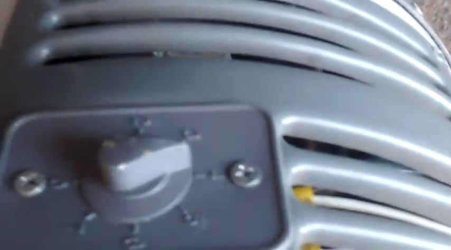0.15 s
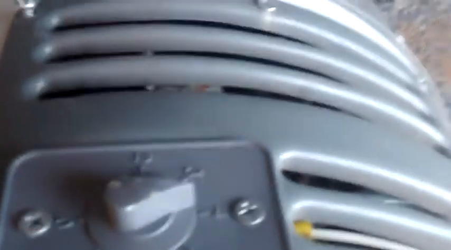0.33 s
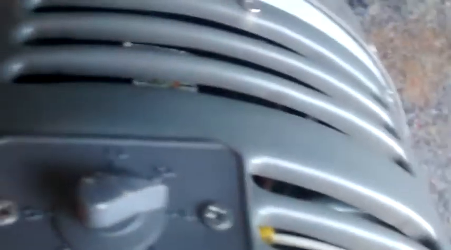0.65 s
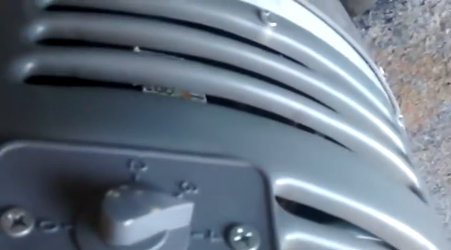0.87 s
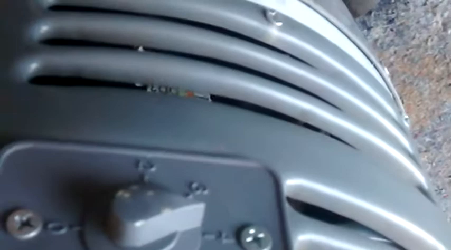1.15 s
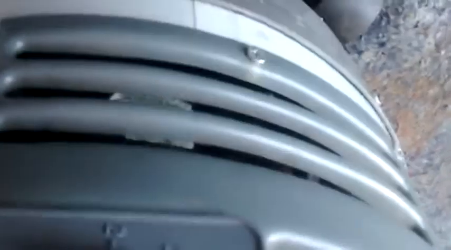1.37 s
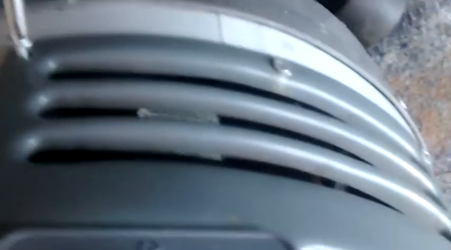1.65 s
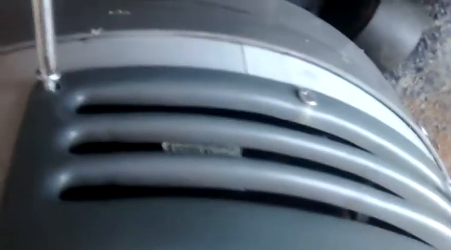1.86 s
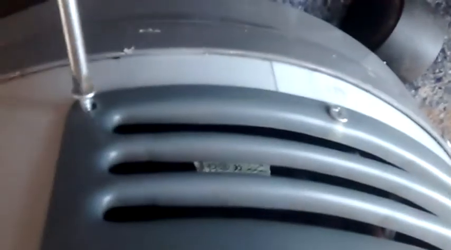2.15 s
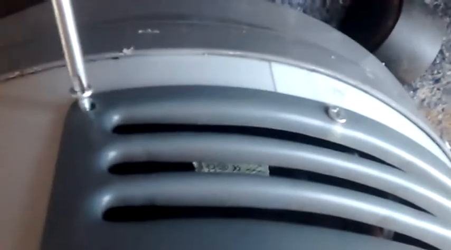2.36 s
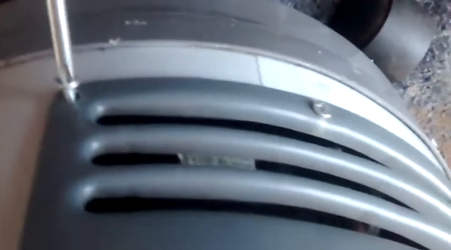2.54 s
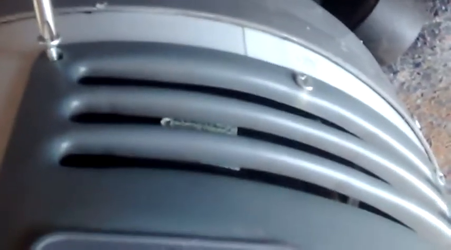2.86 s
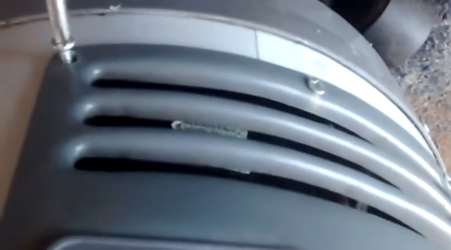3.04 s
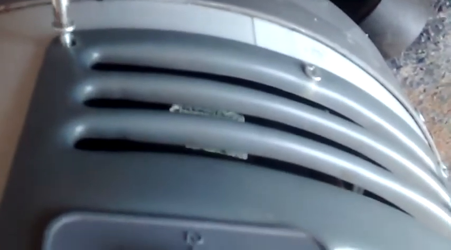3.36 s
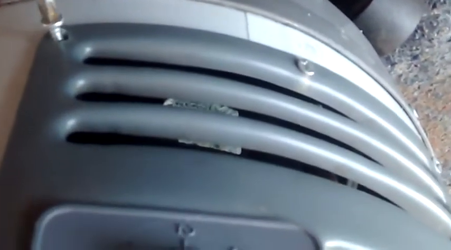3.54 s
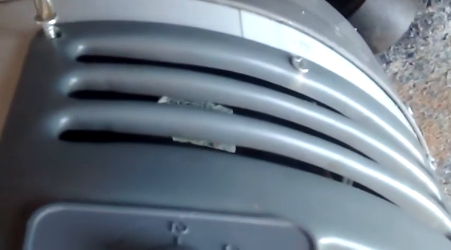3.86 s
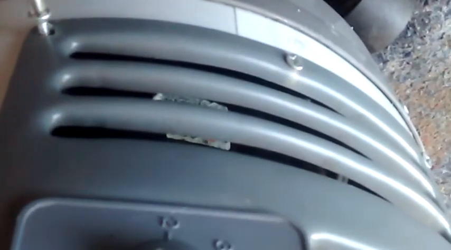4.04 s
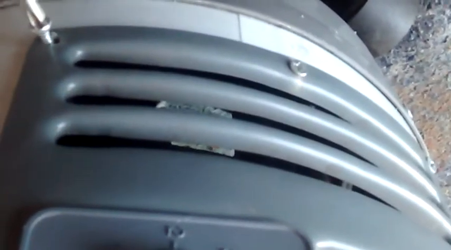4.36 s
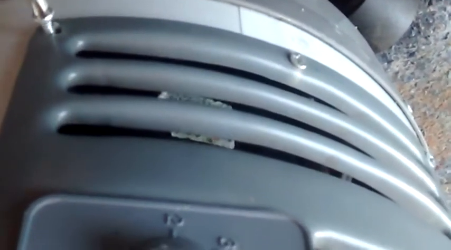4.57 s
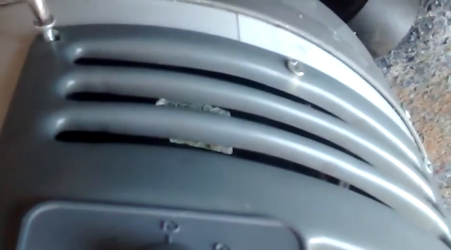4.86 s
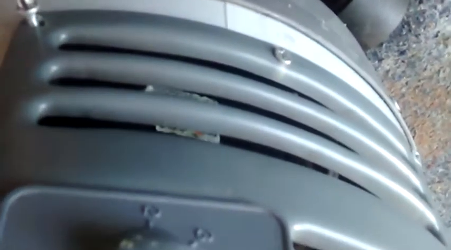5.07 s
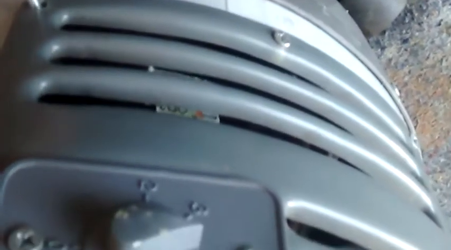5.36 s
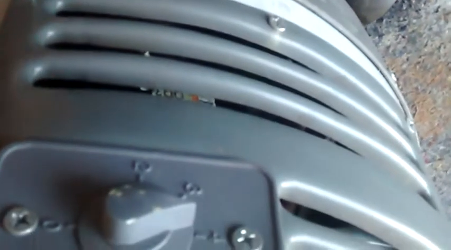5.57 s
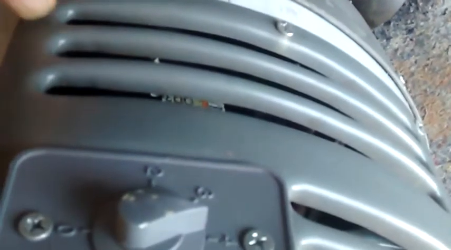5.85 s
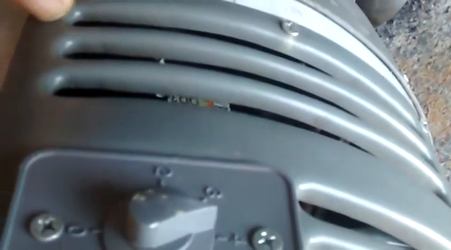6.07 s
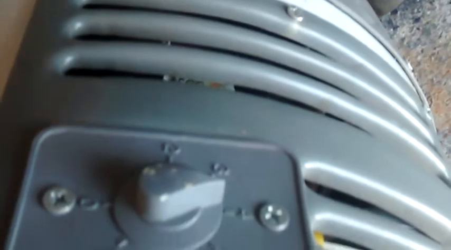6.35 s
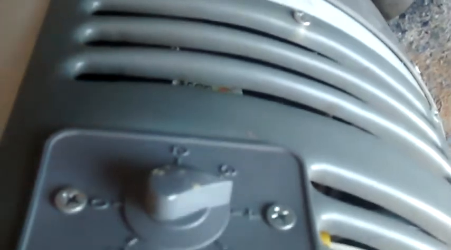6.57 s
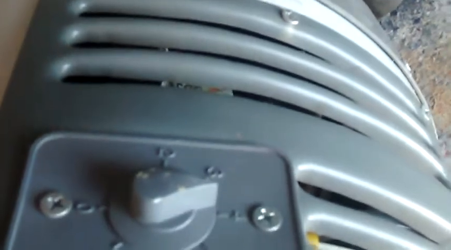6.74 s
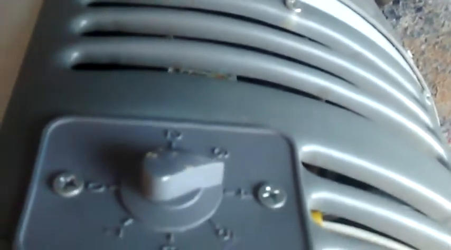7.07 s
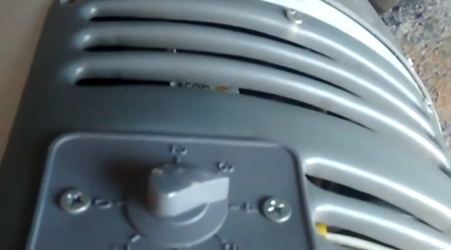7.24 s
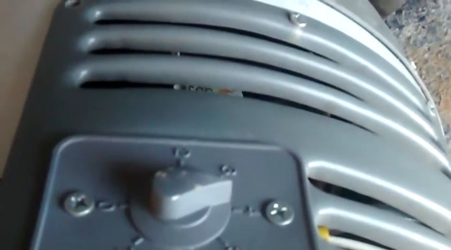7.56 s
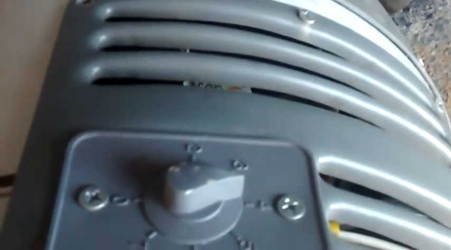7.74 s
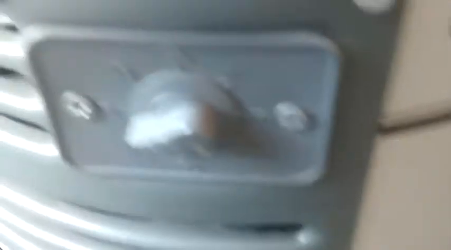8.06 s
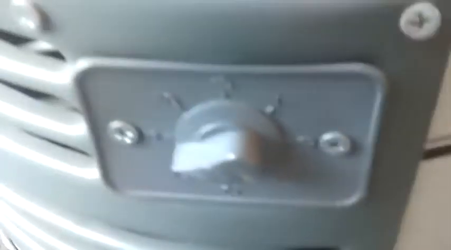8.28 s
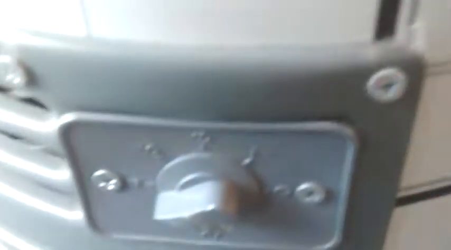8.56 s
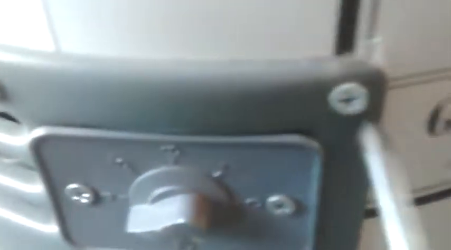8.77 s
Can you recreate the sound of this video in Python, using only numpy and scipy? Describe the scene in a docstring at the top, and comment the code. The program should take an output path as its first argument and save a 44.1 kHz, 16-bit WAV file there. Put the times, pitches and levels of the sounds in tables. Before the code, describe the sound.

A small refrigeration machine hums, whirs and buzzes steadily up close, with light metallic screwdriver clicks and one loud hollow knock on its casing.

```python
"""Close beside a small refrigerator, heard through a handheld phone with two microphones.
A five-blade fan makes shaped noise, its motor and the mains hum as sines, and once a turn the compressor
taps its steel shell, which rings as a buzz. A screwdriver makes light clicks of ringing steel and one loud,
hollow knock on the cabinet among softer ones. Near the end the phone swings away from the shell."""
import sys
import numpy as np
from scipy import signal
from scipy.fft import rfft, irfft
from scipy.io import wavfile

SR = 44100
rng = np.random.default_rng(int(sys.argv[2]) if len(sys.argv) > 2 else 0)


def dump(signal):
    """Clip the signal to [-1, 1] and save it as 16-bit WAV at the path in sys.argv[1]."""
    limited = np.clip(np.atleast_2d(signal).T, -1, 1)
    pcm = np.round(limited * 32767).astype(np.int16)
    wavfile.write(sys.argv[1], SR, pcm)


N = 392931
TIME = np.arange(N) / SR  # s
FREQ = np.maximum(np.fft.rfftfreq(N, 1 / SR), 1)  # Hz, kept above zero for the logarithm
ROTOR_BARS, BLADES, MAINS_HUM_HZ = 26, 5, 120


def undb(db):
    """Turn decibels into a gain."""
    return 10 ** (np.asarray(db) / 20)


def over_time(table):
    """Draw straight lines between the rows of a table to get each column at every sample."""
    s, *columns = np.transpose(table)
    return [np.interp(TIME, s, column) for column in columns]


def over_freq(table):
    """Fill in each column of a table at every frequency, with even steps in pitch."""
    hz, *columns = np.transpose(table)
    return [np.interp(np.log(FREQ), np.log(hz), column) for column in columns]


def walk(rate):
    """Glide smoothly between random values, `rate` of them a second, with a spread near 1."""
    place = TIME * rate
    knots = rng.standard_normal(1024)
    k = place.astype(int) % 1023
    glide = np.sin(np.pi / 2 * (place % 1)) ** 2
    # the factor makes up for the spread lost between the random values
    return 1.169 * (knots[k] + np.diff(knots)[k] * glide)


def ring(modes, t, tilt_db=0, free=1):
    """Ring like a struck solid: each mode is a sine that dies away; `free` under 1 shortens the ring."""
    hz, db, t60 = np.transpose(modes)[:, :, None]
    # the tilt, in dB per octave, turns about the middle pitch
    gain = undb(db + tilt_db * np.log2(hz / np.median(hz)))
    decay = np.exp(-np.log(1000) * t / (t60 * free))
    return np.sum(gain * np.sin(2 * np.pi * hz * t) * decay, axis=0)


def add(track, s, sound):
    """Mix a sound into a track from time s on."""
    start = int(s * SR)
    track[start:start + len(sound)] += sound[:N - start]


def ports(spectrum, pan_db=0, diffuse=False):
    """Sound reaches the two microphones at different levels and phases; diffuse sound is partly unrelated."""
    # the phone's microphones: f/Hz, phase by which left leads/rad, left minus right/dB, coherence/0-1
    microphones = [(30, 3.5, -2, 1), (130, 2, -5, 0.96), (230, 2, 1.7, 0.96), (352, 1.55, 0.5, 0.87),
                   (690, 0.9, 6.5, 0.96), (724, 0.8, 2, 0.74), (1180, -0.5, 3.5, 0.92), (1430, -0.45, 1, 1),
                   (1975, 1.7846, 1, 0.81), (2702, 3, -0.5, 0.99), (2833, 3.5, 0.5, 1), (3140, 4, 1.5, 0.6),
                   (3420, 5, 0, 0.5), (3980, 6, 1, 0.88), (4690, 7.5, 1, 0.78), (7920, 14.5, 2.5, 0.7),
                   (11300, 23, -1.5, 0), (15200, 37, -1.5, 0.3)]
    phase, balance_db, coherence = over_freq(microphones)
    sides = np.array([[1], [-1]])  # left, right
    gain = undb(sides * (balance_db + pan_db) / 2)
    gain = gain / np.sqrt(np.mean(gain ** 2, axis=0))  # keep the mean power of the pair
    if diffuse:
        scatter = np.exp(2j * np.pi * rng.random((2, len(FREQ))))
        spectrum = spectrum * (np.sqrt(coherence) + np.sqrt(1 - coherence) * scatter)
    return irfft(spectrum * gain * np.exp(.5j * sides * phase), N)


SWING_S, SWING_TAKES_S = 7.95, 0.06  # middle and length of the phone's swing away from the shell


def swung():
    """The phone turns steadily during its swing: 0 before, 1 after."""
    return np.clip((TIME - SWING_S) / SWING_TAKES_S + .5, 0, 1)


def fan_turns():
    """Turns of the fan so far; the whine lies one mains hum above the rate of the rotor bars."""
    # whine of the fan motor, which follows the fan's wandering speed: t/s, f/Hz
    whine = [(0.0, 792.0), (0.1, 793.6), (0.79, 786.7), (1.02, 790.8), (2.13, 791.2), (2.26, 795.1),
             (2.41, 787.5), (2.66, 794.0), (2.9, 790.0), (3.13, 793.0), (3.33, 786.6), (3.67, 793.2),
             (3.9, 785.5), (4.24, 790.9), (6.06, 789.5), (6.4, 795.1), (6.7, 784.8), (7.25, 792.1),
             (7.59, 784.8), (8.12, 790.9), (8.41, 788.4), (8.69, 793.7), (8.91, 793.4)]
    whine_hz, = over_time(whine)
    fan_hz = (whine_hz - MAINS_HUM_HZ) / ROTOR_BARS
    return np.cumsum(fan_hz) / SR


def airflow(flutter_db=1.45, throb=0.058, throb_twice=0.079, hiss_hz=2500):
    """Turbulent air is noise that throbs once and twice a fan turn; the housing's resonances colour it."""
    # rush of air through the grille, before the housing: f/Hz, level/dB per Hz
    grille = [(12, -57), (28, -60), (60, -77.5), (85, -74), (105, -69.5), (140, -61), (300, -71),
              (700, -74.5), (1050, -86.5), (2000, -85.5), (3100, -99), (4500, -97.5), (9000, -104.5),
              (10500, -109.1), (15000, -115.3)]
    # resonances of the housing: f/Hz, width at half the lift in dB/Hz, lift/dB
    housing = [(182.2, 45.6, 10), (257.4, 37, 5), (390, 148, 4), (527, 23.5, 6), (613, 128, 8),
               (917, 105, 6.5), (1213, 60, 6), (1327, 39, 6), (1540, 57, 2.5), (1906, 120, 3),
               (2205, 55, -8), (2390, 53, -3), (2543, 850, 6), (4070, 370, 1), (6360, 190, 2),
               (7850, 420, 0.5)]
    # what the moving phone picks up of the rush: t/s, body/dB, hiss/dB
    position = [(0, 1, 1), (.7, 0.5, -1), (1.2, -0.3, 0.5), (1.7, -0.06, 0.5), (4, 0, -0.6), (6, -0.6, 0.5),
                (7.8, 0.5, -1.1), (8.15, 2, -3), (8.4, 0.6, -1.5), (8.55, 4.5, -4.5), (8.72, 0.4, -5),
                (8.91, 1.5, -1.5)]
    # change of the rush once the phone has swung: f/Hz, left/dB, right/dB, added lead of the left/rad
    swing = [(120, 3, -2, 0.029), (252, -4.5, -1, -0.02), (370, 2, 0, 0.24), (490, -6, -4.5, -0.026),
             (620, -1.5, 1, -0.83), (970, 2, 3, -0.57), (1400, -2.5, 3.5, 0.87), (1500, 4, 6.5, 0.69),
             (1650, -11, 2.5, 0.83), (2020, -6, 2.5, 0.97), (2700, -1, -1, 0.88), (3440, 2.5, 3, 0.042),
             (4300, -1.5, -0.5, 0.76), (5300, 1.5, 1.5, -0.071), (8500, -2, 0, 0.081),
             (12000, -1.5, -.5, 0)]

    level_db, = over_freq(grille)
    for hz, width, lift_db in housing:
        level_db = level_db + lift_db * .5 ** ((2 * (FREQ - hz) / width) ** 2)

    eddies = rng.standard_normal(N) * np.sqrt(SR / 2)  # white noise at 0 dB per Hz
    angle = 2 * np.pi * fan_turns()
    fan_throb = 1 + throb * np.cos(angle) + throb_twice * np.cos(2 * angle)
    body_db, hiss_db = over_time(position)
    # only the body throbs; body and hiss cross over around hiss_hz and flutter separately
    treble = FREQ ** 2 / (FREQ ** 2 + hiss_hz ** 2)
    body = rfft(eddies * fan_throb * undb(body_db + flutter_db * walk(55))) * (1 - treble)
    hiss = rfft(eddies * undb(hiss_db + 1.23 * walk(25))) * treble
    rush = ports((body + hiss) * undb(level_db), diffuse=True)

    # once the phone has swung round, each microphone hears the grille from a new angle
    left_db, right_db, lead = over_freq(swing)
    shift = np.exp(.5j * np.array([lead, -lead]))
    turned = irfft(rfft(rush) * undb([left_db, right_db]) * shift, N)
    return rush * (1 - swung()) + turned * swung()


def tone(turns, db):
    """A sine follows the given count of cycles, at an rms level in dB."""
    return np.sqrt(2) * undb(db) * np.sin(2 * np.pi * (turns + rng.random()))


def hum(swing_db=-1.5):
    """Mains hum beats with the blade tone, rotor bars whine with the fan speed, and the housing drones."""
    # tones before the swing; both multiples are rounded to whole numbers below:
    # cycles per fan turn, cycles per mains hum cycle, level/dB, wobble/dB
    fan_tones = [(0, 1, -39, 1.07), (2.5, -0.5, -70, 0), (BLADES, 0, -42.5, 1.8), (3, 1, -46.5, 2.5),
                 (4, 1, -55, 0.5), (3 * BLADES, 0, -58.5, 2.5), (ROTOR_BARS, -1, -58.5, 2.5),
                 (ROTOR_BARS, 0, -60.5, 3), (ROTOR_BARS, 1, -52.5, 0.92), (ROTOR_BARS, 2, -66.5, 2.3)]
    # fainter wavering housing tones before the swing: f/Hz, level/dB, wobble/dB, pitch wander/Hz
    drones = [(526, -55.5, 3, 4.43), (589.7, -55, 2, 2.19), (831, -72, 0, 1.95), (870, -64.5, 2, 2.49),
              (890, -66, 2, 2.56), (1308, -72.5, 4, 6)]
    out, fan = np.zeros(N), fan_turns()
    for per_turn, per_hum, db, wobble_db in fan_tones:
        turns = round(per_turn) * fan + round(per_hum) * MAINS_HUM_HZ * TIME
        out += tone(turns, db + wobble_db * walk(7))
    for hz, db, wobble_db, wander_hz in drones:
        turns = np.cumsum(hz + wander_hz * walk(6)) / SR
        out += tone(turns, db + wobble_db * walk(7))
    return ports(rfft(out * undb(swing_db * swung())))


def buzz_level():
    """The buzz follows the phone's place, wavers with the unsteady hand and falls away after the swing."""
    # buzz of the shell where the phone is held, before the compressor's trim: t/s, level/dB
    held = [(0.0, -56), (0.46, -55), (1.1, -52.5), (1.87, -60.5), (2.25, -58), (4.03, -53.5), (4.18, -58.5),
            (5.76, -57), (5.87, -62), (7.46, -57.5), (7.77, -66), (7.9, -59.5)]
    sway_db, sway_per_s = 0.7, 5.9  # depth of the waver, and its random values a second
    away_db, retreat_db_per_s = -5, -6.5  # drop with the swing, then fade as the phone retreats
    held_db, = over_time(held)
    fall_db = away_db * swung() + retreat_db_per_s * np.maximum(TIME - SWING_S, 0)
    return held_db + sway_db * walk(sway_per_s) + fall_db


def compressor(scatter_db=1.1, jitter_s=.000007, trim_db=5.5, valve_db=-64, valve_s=0.0023):
    """The piston taps the shell once a turn, giving a comb of close lines; the valve spits noise with it."""
    # compressor shaft: t/s, speed/Hz
    shaft = [(0, 58.26), (2, 58.3), (5, 58.4), (8.91, 58.41)]
    # resonances of the steel shell: f/Hz, width of each of two passes/Hz, relative level/dB
    shell_modes = [(1834, 98, -7.5), (1988, 96, 4), (2300, 73, -8.5), (8130, 270, -26)]

    shaft_hz, = over_time(shaft)
    turns = np.cumsum(shaft_hz) / SR
    strokes = np.interp(np.arange(1, int(turns[-1])), turns, TIME)
    chance = rng.standard_normal((len(strokes), 2))
    place = np.clip((strokes + jitter_s * chance[:, 0]) * SR, 0, N - 2)
    size = undb(scatter_db * chance[:, 1])
    # share each tap between two samples, so its time need not fall on one
    taps, first = np.zeros(N), place.astype(int)
    taps[first] += size * (1 - place % 1)
    taps[first + 1] += size * (place % 1)

    # each resonance acts twice, which keeps the buzz narrow; neighbours swing in opposite senses
    shell = 0
    for k, (hz, width, db) in enumerate(shell_modes):
        resonance = 1 / (1 + 1j * hz / width * (FREQ / hz - hz / FREQ))
        shell = shell + (-1) ** k * undb(db) * resonance ** 2
    buzz = irfft(rfft(taps) * shell, N)
    buzz = buzz / np.std(buzz) * undb(buzz_level() + trim_db)

    since_tap = (turns % 1) / shaft_hz  # s
    spit = rng.standard_normal(N) * np.exp(-since_tap / valve_s)
    spit_band = signal.butter(1, [2000, 7000], "band", fs=SR, output="sos")
    spit = signal.sosfilt(spit_band, spit)
    return ports(rfft(buzz + undb(valve_db) * spit))


def clicks(crack_s=0.0006, tail_db=-26, tail_s=0.048, low_hz=1900, high_hz=9800, pan_db=3.5):
    """Steel touches steel: a short noisy crack, a ring that contact can shorten, and a faint room tail."""
    # clicks of the screwdriver's shaft: t/s, level/dB, brightness/dB per octave, crack before the
    # click's level/dB, share of the free ring time/0-1, ratio that raises pitch and speeds the decay
    click_list = [(2.6745, -53, 2, 4, .6, 1), (5.2754, -53, -3, 0, .7, 1.04), (5.335, -47.5, -8, 0, 0.7, 1),
                  (6.1944, -42, 0, 6, .4, 1.1), (6.5777, -34, 4, -3, .55, 1.1),
                  (6.5784, -36.5, -6.5, 4, 0.55, 0.93), (6.5803, -39, -9, 5, 0.36, 1.03),
                  (6.5957, -36, 6, 2, .7, 1.03), (6.603, -45, 5, 5, .5, 1.06),
                  (6.634, -43, -3, -12, 0.9, 1.06), (6.6767, -31.5, 3, 2, .9, 1),
                  (6.6789, -34, 1, -4, 1, 1), (6.6935, -47, -1, -10, 1, 1.02),
                  (7.869, -51, -4, 4, .5, 0.89)]
    # steel of the clicks, at pitch ratio 1 and ringing freely: f/Hz, relative level/dB, t60/s
    steel = [(1950, -7, 0.013), (2820, -5, 0.017), (3680, -13, .01), (4200, -5, 0.027), (4900, -12, 0.012),
             (6250, -13, 0.032), (6900, -32, 0.011), (8260, -8.5, 0.02), (8860, -15, 0.013),
             (10300, -21, .012), (13400, -26, .012)]
    out, t = np.zeros(N), TIME[:SR // 8]
    band = signal.butter(5, [low_hz, high_hz], "band", fs=SR, output="sos")
    for s, db, bright_db, crack_db, free, pitch in click_list:
        grit = signal.sosfilt(band, rng.standard_normal(len(t)))
        crack = undb(crack_db) * np.exp(-t / crack_s)
        tail = undb(tail_db) * np.exp(-t / tail_s)
        steel_ring = ring(steel, t * pitch, bright_db, free)
        add(out, s, undb(db) * (steel_ring + grit * (crack + tail)))
    return ports(rfft(out), pan_db)


def knocks(boom_db=-17.0206, boom_s=0.013, cabinet_low_hz=295):
    """The handle lands on the hollow cabinet and rocks to rest; a longer contact sounds duller."""
    # handle on the cabinet: t/s, level/dB, contact (pi times the push's decay time)/s,
    # left minus right before the microphones' own balance/dB
    knock_list = [(2.676, -22, 0.00082, -2), (6.1953, -11, 0.00087, -4), (6.2102, -27, 0.0009, -7),
                  (6.2205, -25, .0009, -6), (7.87, -32, 0.0009, -18)]
    # modes of the cabinet: f/Hz, relative level/dB, t60/s
    cabinet = [(329, -18, 0.1), (438, -17.5, 0.094), (520, -2.5, 0.02), (544, -13, 0.1), (610, -20, 0.06),
               (695, -29, .05), (1130, -22, 0.058), (1330, -10, 0.015), (1770, -14, 0.037),
               (1945, -11, 0.038), (2300, -9, 0.013), (2920, -14, 0.013), (4600, -21, .006),
               (8040, -20, .005)]
    out, t = np.zeros((2, N)), TIME[:SR // 4]
    hollow = signal.butter(4, [320, 720], "band", fs=SR, output="sos")
    # the small panel radiates little low sound
    panel = signal.butter(3, cabinet_low_hz, "high", fs=SR, output="sos")
    for s, db, contact, pan_db in knock_list:
        push = np.exp(-np.pi * t / contact)
        # the many weaker panel modes merge into a short boom
        boom = signal.sosfilt(hollow, rng.standard_normal(len(t)))
        boom *= undb(boom_db) / np.std(boom) * np.exp(-t / boom_s)
        blow = signal.fftconvolve(ring(cabinet, t) + boom, push / push.sum())[:len(t)]
        blow = signal.sosfilt(panel, blow)
        add(out[0], s, undb(db + pan_db / 2) * blow)
        add(out[1], s, undb(db - pan_db / 2) * blow)
    return ports(rfft(out))


def scene():
    """The running refrigerator and the screwdriver add up."""
    return airflow() + hum() + compressor() + clicks() + knocks()


def record(dry):
    """The phone cuts the top of the treble with a steep low-pass filter."""
    top_hz = 15450
    low_pass = signal.ellip(10, .1, 80, top_hz, fs=SR, output="sos")  # ripple dB, stop band dB
    return signal.sosfilt(low_pass, dry)


dry = scene()
out = record(dry)
dump(out)
```